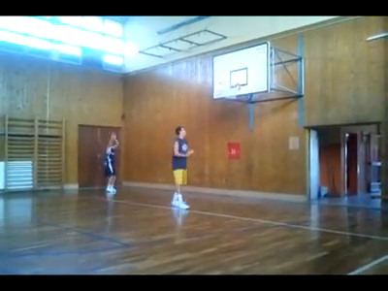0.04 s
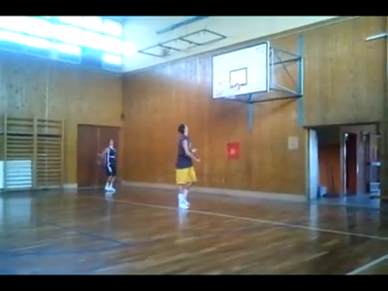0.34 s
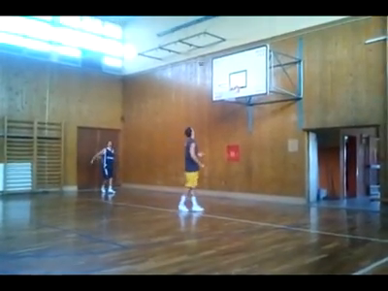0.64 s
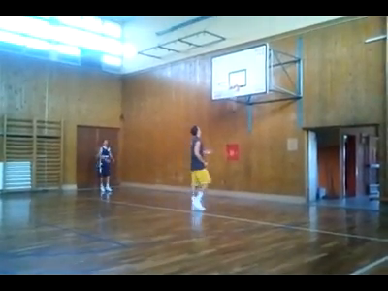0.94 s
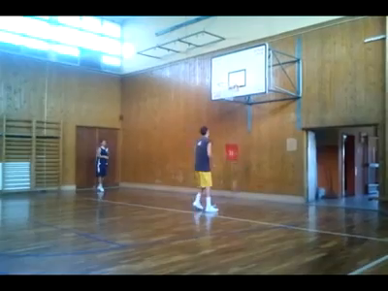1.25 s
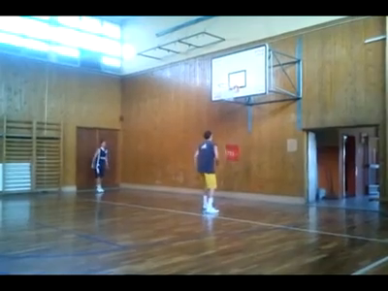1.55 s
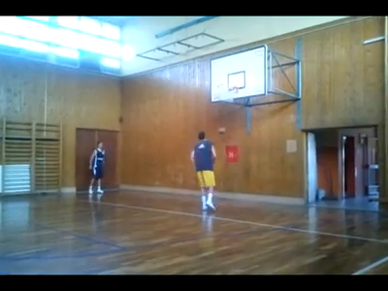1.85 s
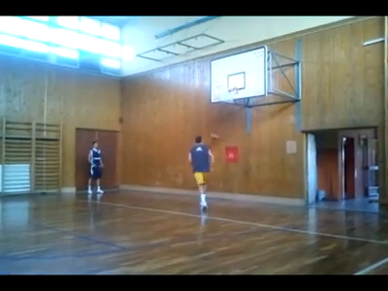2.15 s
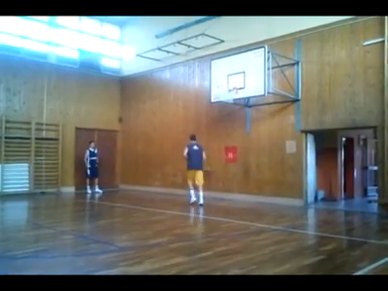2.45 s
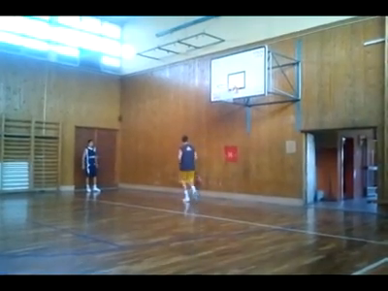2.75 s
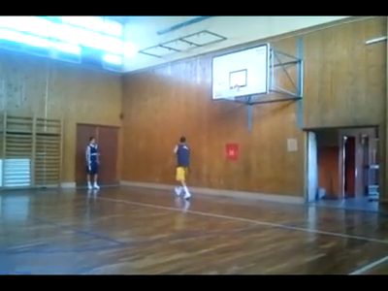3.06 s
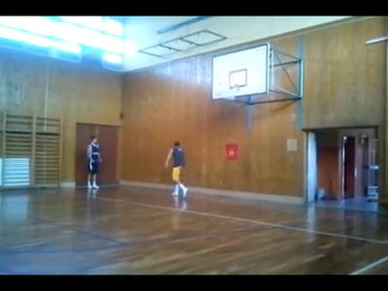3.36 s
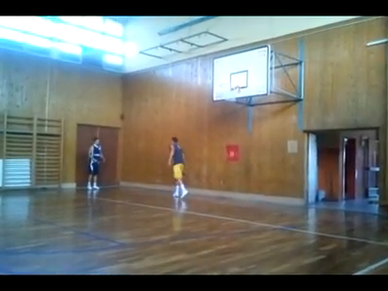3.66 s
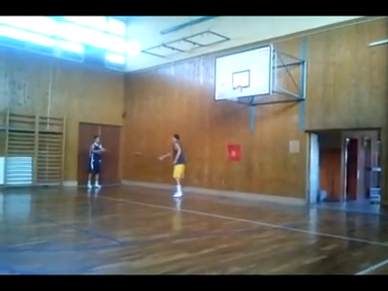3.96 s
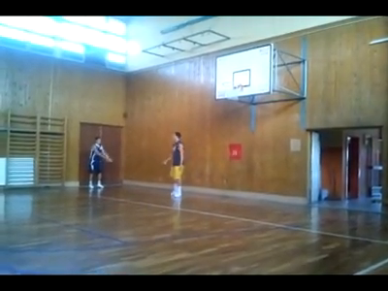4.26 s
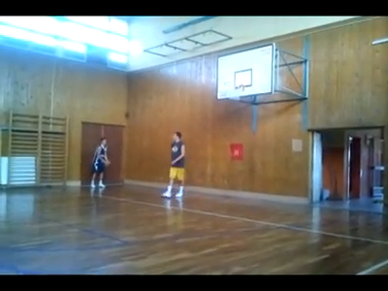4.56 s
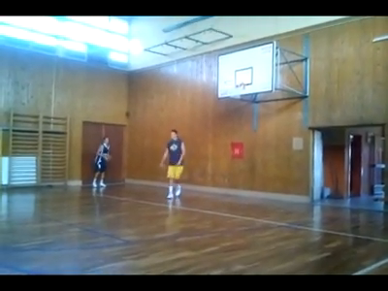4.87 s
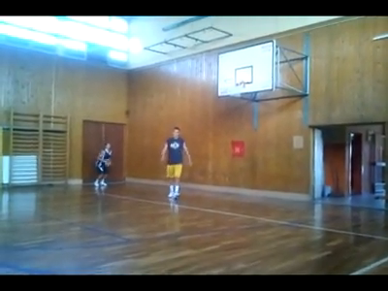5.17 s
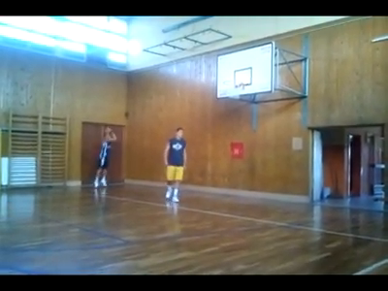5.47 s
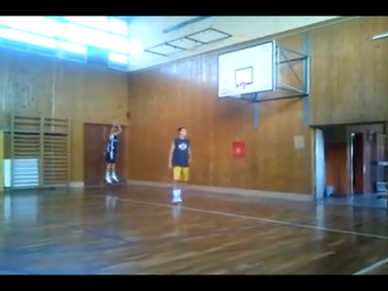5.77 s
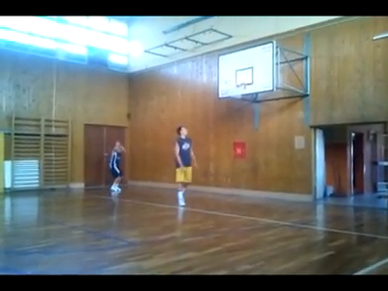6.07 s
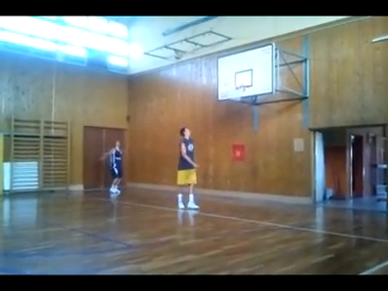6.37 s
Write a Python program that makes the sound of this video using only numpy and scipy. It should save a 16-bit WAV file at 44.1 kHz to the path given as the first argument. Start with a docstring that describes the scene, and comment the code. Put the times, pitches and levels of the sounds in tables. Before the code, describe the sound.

In a large echoing gym, feet land, a basketball clatters against the rim, sneakers squeak and the ball bounces three times.

```python
"""A large, echoing gym with a sprung wooden floor, during shooting practice. A player lands from a jump shot.
The ball strikes the hoop, exciting the modes of the backboard and rattling its loose fittings, then bounces
three times and is caught. Sneakers thud on the boards, scuff by sliding friction and squeak by stick-slip. The
hall reverberates over a steady rumble of air; the sound has no treble above 8 kHz, and the loud blows are
flattened."""
import sys
import numpy as np
from scipy import signal
from scipy.fft import rfft, irfft
from scipy.io import wavfile
from scipy.ndimage import uniform_filter1d

SR = 44100
rng = np.random.default_rng(int(sys.argv[2]) if len(sys.argv) > 2 else 0)


def pcm_store(signal):
    """Save signal as 16-bit PCM."""
    levels = np.round(np.clip(np.atleast_2d(signal), -1, 1) * 32767)
    wavfile.write(sys.argv[1], SR, levels.astype(np.int16).T)


N = 283122

# Spectra of the ball's low thump and bright slap: frequency_hz, relative_db
THUMP_SPECTRUM = [(25, -19), (45, -2), (65, -0.5), (110, 1.5), (175, -5.3), (250, -17.5), (450, -22.5),
                  (700, -26), (1100, -38)]
SLAP_SPECTRUM = [(100, -3), (300, -3), (450, -6.5), (650, -7), (850, 3.5), (1200, 2.5), (1600, 3.2),
                 (2200, 3.8), (3100, -6.5), (5500, -6), (8000, -8)]
# Ball impacts on the floor, the first heard only as reverberation: start_s, thump_db, slap_db, ring_hz
BALL_IMPACTS = [(-1.62, -9.5, -21.5, 846), (1.928, -7.3, -12, 593), (3.244, -10, -19.8, 810),
                (3.933, -10.7, -15.8, 1186)]


def bounces(treble_hz=3500, treble_db=-10.5, ring_t60_s=0.04, ring_db=-26.5):
    """Elastic impact: the ball thumps the floor, its skin slaps the boards, and the boards ring at a pitch that
    changes from spot to spot."""
    out, t = np.zeros(N), seconds(2048)
    thump, slap = knock(THUMP_SPECTRUM), knock(SLAP_SPECTRUM)
    treble = signal.lfilter(*signal.butter(1, treble_hz, "high", fs=SR), slap)
    slap = slap + from_db(treble_db) * treble
    for start_s, thump_db, slap_db, ring_hz in BALL_IMPACTS:
        contact_s = 0.013 * from_db(slap_db)   # a harder bounce keeps the ball flattened longer
        # the contact patch spreads, smearing the slap in time without colouring it
        burst = rfft(rng.standard_normal(len(t)) * np.exp(-t / contact_s))
        spread = irfft(burst / np.abs(burst)) * np.exp(-t / (10 * contact_s))
        smack = signal.fftconvolve(slap, unit_energy(spread))
        board_ring = unit_energy(ring(ring_hz, ring_t60_s, len(slap)))
        add(out, start_s, hall(from_db(thump_db) * thump, direct_db=25.5))
        add(out, start_s, hall(from_db(slap_db) * smack, direct_db=33))
        add(out, start_s, hall(from_db(ring_db) * board_ring, direct_db=17))
    return out


# Spectrum of a fitting hitting the backboard: frequency_hz, relative_db
RATTLE_SPECTRUM = [(60, -3.5), (150, -1.5), (280, -2.7), (600, -4.5), (1000, -2.5), (1400, 0), (1900, 0.5),
                   (2400, -7), (3100, -16.5), (4500, -19), (6200, -24.5), (8000, -29.5)]
# Modes of the backboard and its steel frame: pitch_hz, level_db, t60_s
FRAME_MODES = [(23.93, -12.5, 4.1), (28.3, -22.5, 3.0), (55.2, -16, 6), (69.4, -7, 0.68),
               (136.6, -26.5, 1.6), (627, -28, 6.8), (705, -31.5, 3.5), (897, -31.5, 9.8), (1634, -25, 2.2),
               (1840, -29.5, 2.2), (2573, -30, 2.0)]


def hoop(start_s=1.465, rattle_db=-5, clicks_per_s=400, spread_db=3.5, graze_db=-15, boom_db=-33,
         sway_hz=7.9):
    """Modal vibration: the ball hits the rim, the board booms, the frame rings, loose fittings chatter."""
    out = np.zeros(N)
    clicks = (rng.random(SR) < clicks_per_s / SR) * rng.choice([-1, 1], SR)
    clicks = clicks * from_db(rng.normal(0, spread_db, SR)) * shaking(seconds(SR))
    rattle = unit_energy(signal.fftconvolve(clicks, knock(RATTLE_SPECTRUM)))
    add(out, start_s, hall(from_db(rattle_db) * rattle, direct_db=27))
    add(out, start_s, hall(from_db(graze_db) * knock(SCUFF_SPECTRUM), direct_db=14))
    for pitch_hz, level_db, t60_s in FRAME_MODES:
        swell = 1 - np.exp(-seconds(N) * (pitch_hz / sway_hz) ** 2)   # slow modes build up late
        add(out, start_s, from_db(level_db) * swell * ring(pitch_hz, t60_s, N))
    add(out, start_s, hall(from_db(boom_db) * knock(THUMP_SPECTRUM), direct_db=24))
    return out


def shaking(t, attack_s=0.02, hold_s=0.19, release_s=0.028, sag_db_per_s=20,
            linger_db=-6, linger_t60_s=1.45):
    """Two-stage decay of the rattle's force: the hoop shakes hard, then the fittings chatter on quietly."""
    hard = from_db(-sag_db_per_s * t) * np.exp(-np.maximum(t - hold_s, 0) / release_s)
    lingering = from_db(linger_db - 60 * t / linger_t60_s)
    return (1 - np.exp(-t / attack_s)) * np.maximum(hard, lingering)


def landing(start_s=0.629, heel_lag_s=0.022, toe_db=-17, heel_db=-8.8):
    """Momentum transfer in two impacts: the toes touch, then the heels bring down the whole weight."""
    out = np.zeros(N)
    add(out, start_s, hall(footfall(toe_db), direct_db=18.5))
    add(out, start_s + heel_lag_s, hall(from_db(heel_db) * knock(THUD_SPECTRUM), direct_db=31))
    return out


# Spectra of the boards' thud and the sole's tap: frequency_hz, relative_db
THUD_SPECTRUM = [(25, -3.5), (55, 1), (120, 2.5), (200, -10), (330, -13.5), (600, -17.5), (1100, -25),
                 (2200, -33), (3200, -45), (8000, -50)]
TAP_SPECTRUM = [(200, 0.5), (900, 1.5), (2100, 3), (3200, -6), (5500, -9.5), (8000, -9)]


def footfall(level_db, tap_db=-10):
    """Impact excitation: one blow draws a thud from the boards and a weaker tap from the sole."""
    return from_db(level_db) * (knock(THUD_SPECTRUM) + from_db(tap_db) * knock(TAP_SPECTRUM))


# Feet meeting the floor: start_s, level_db
FOOT_IMPACTS = [(.03, -43), (.118, -38.5), (3.765, -30), (3.828, -29.5), (5.614, -47), (5.84, -42),
                (6.072, -39)]


def steps():
    """Impact sound of walking: each light footfall excites the floor and the hall."""
    out = np.zeros(N)
    for start_s, level_db in FOOT_IMPACTS:
        add(out, start_s, hall(footfall(level_db), direct_db=31))
    return out


# Spectrum of a dragged sole, also of the ball grazing the rim and of cloth brushing: frequency_hz, relative_db
SCUFF_SPECTRUM = [(300, 0.5), (1500, 4), (3200, -3.5), (5500, -2.5), (8000, -0.5)]
# Soles dragging, and at 5.28 s a swish of cloth: start_s, length_s, level_db
DRAGS = [(1.137, 0.21, -34), (2.756, .16, -40.5), (3.221, 0.021, -25), (3.72, 0.07, -33.5),
         (4.871, 0.039, -42), (5.284, 0.19, -37.5), (5.86, .03, -50), (6.029, 0.012, -45),
         (6.4, 0.012, -42)]


def scuffs():
    """Sliding friction: a dragged sole or brushing cloth makes broadband noise that swells and fades with the
    stroke."""
    out, t = np.zeros(N), seconds(SR // 2)
    for start_s, length_s, level_db in DRAGS:
        stroke = np.sin(np.pi * np.minimum(t / length_s, 1))
        friction = signal.fftconvolve(stroke * rng.standard_normal(len(t)), knock(SCUFF_SPECTRUM))
        add(out, start_s, hall(from_db(level_db) * unit_energy(friction), direct_db=31.5))
    return out


# Soles sticking and slipping: start_s, length_s, pitch_hz, waver_hz, level_db
SOLE_SQUEAKS = [(.645, 0.06, 4780, 200, -36.5), (1.688, 0.06, 4230, 150, -23),
                (1.69, 0.042, 7650, 190, -21.5), (1.717, 0.037, 4140, 65, -19),
                (6.029, .014, 6140, 400, -59)]


def squeaks(sag_hz=95, beam_db=41, beam_hz=4200, beam_fall_db_per_octave=12):
    """Stick-slip oscillation: rubber on varnish whistles unsteadily, sinking in pitch as the foot slows."""
    out, t = np.zeros(N), seconds(SR // 4)
    for start_s, length_s, pitch_hz, waver_hz, level_db in SOLE_SQUEAKS:
        progress = np.minimum(t / length_s, 1)
        waver = uniform_filter1d(rng.standard_normal(len(t)), size=50)
        slip_hz = pitch_hz - sag_hz * (progress - .5) + waver_hz * waver / waver.std()
        tone = np.sin(2 * np.pi * np.cumsum(slip_hz) / SR)
        whistle = from_db(level_db) * unit_energy(np.sin(np.pi * progress) * tone)
        direct_db = beam_db - beam_fall_db_per_octave * np.log2(pitch_hz / beam_hz)
        add(out, start_s, from_db(direct_db) * whistle)   # direct path, weaker for high whistles
        add(out, start_s, hall(whistle, direct_db=13))
    return out


def catch(start_s=4.872, pitch_hz=350, t60_s=0.052, level_db=-40.3):
    """Damped resonance: the ball gives a hollow pop as hands close on it."""
    out = np.zeros(N)
    pop = from_db(level_db) * unit_energy(ring(pitch_hz, t60_s, SR // 4))
    add(out, start_s, hall(pop, direct_db=40))
    return out


# Reverberation time of the hall: frequency_hz, t60_s
REVERBERATION_TIMES = [(40, 1.6), (100, 1.5), (200, 1.47), (400, 3), (800, 4), (1600, 4), (2800, 3.5),
                       (4200, 2.5), (7500, 1.55)]


def diffuse_tail(t, band_count=12):
    """Diffuse field: overlapping bands of noise, each decaying exponentially at its own rate."""
    centres_hz = np.geomspace(40, 8000, band_count)
    hz = np.fft.rfftfreq(len(t), 1 / SR)
    bands = np.array([at_hz(np.column_stack([centres_hz, row]), hz) for row in np.eye(band_count)])
    decays = from_db(-60 * t / at_hz(REVERBERATION_TIMES, centres_hz)[:, None])
    band_noise = irfft(bands * rfft(rng.standard_normal(len(t))))
    return np.sum(band_noise * decays, axis=0)


# Early wall reflections, relative to the direct sound: delay_s, level_db
WALL_REFLECTIONS = [(.0045, -6.5), (.019, -6.5), (.0225, -11.5), (0.033, -8), (0.037, -6.5), (.087, -9)]


def hall(sound, direct_db, early_db=0.5, early_s=0.044, build_s=0.004):
    """Room impulse response: direct sound, early reflections and a tail that differs from spot to spot."""
    t = seconds(4 * SR)
    response = diffuse_tail(t) * (1 - np.exp(-t / build_s)) * from_db(early_db * np.exp(-t / early_s))
    response[0] += from_db(direct_db)
    for delay_s, level_db in WALL_REFLECTIONS:
        response[round(abs(delay_s) * SR)] += from_db(direct_db + level_db)
    return signal.fftconvolve(sound, response)


# Spectrum of the room's air noise: frequency_hz, relative_db
AIR_SPECTRUM = [(12, -21.5), (20, 1), (160, -3.5), (233, -14.5), (575, -15), (859, -12.5), (1020, -16.5),
                (1130, -12), (1250, -15), (2070, -18.5), (3680, -33), (7420, -25.5), (8000, -34.5),
                (10400, -73), (17600, -120)]


def air(level_db=-41.5):
    """Stationary noise: the steady rumble and hiss of the big room."""
    colour = from_db(at_hz(AIR_SPECTRUM, np.fft.rfftfreq(N, 1 / SR)))
    noise = irfft(rfft(rng.standard_normal(N)) * colour, N)
    return from_db(level_db) * noise / noise.std()


def knock(spectrum, size=8192):
    """Minimum phase: the shortest causal pulse with this spectrum, at unit energy."""
    cepstrum = irfft(np.log(from_db(at_hz(spectrum, np.fft.rfftfreq(size, 1 / SR)))))
    cepstrum[1:size // 2] *= 2
    cepstrum[size // 2 + 1:] = 0
    return unit_energy(irfft(np.exp(rfft(cepstrum))))


def ring(pitch_hz, t60_s, count):
    """Damped harmonic oscillator: a struck mode falls 60 dB in t60_s."""
    t = seconds(count)
    return from_db(-60 * t / t60_s) * np.sin(2 * np.pi * pitch_hz * t)


def from_db(db):
    """Decibels to amplitude ratio."""
    return 10 ** (np.asarray(db) / 20)


def at_hz(points, hz):
    """Interpolation of a table on a log-frequency axis."""
    known_hz, values = np.transpose(points)
    return np.interp(np.log(np.maximum(hz, 1)), np.log(known_hz), values)


def unit_energy(x):
    """Normalisation to energy 1."""
    return x / np.sqrt(np.sum(x ** 2) + 1e-20)


def seconds(count):
    """Time axis of count samples."""
    return np.arange(count) / SR


def add(out, start_s, sound):
    """Superposition of a sound onto the mix, from start_s on."""
    start = round(start_s * SR)
    part = sound[max(-start, 0):N - start]
    out[max(start, 0):][:len(part)] += part


def scene():
    """Superposition of all sources on the court at one listening point."""
    return (bounces() + hoop() + landing() + steps() + scuffs() + squeaks() + catch() + air())[None]


def record(dry, overload=1.0, ceiling=0.98, band_hz=8050, cutoff_hz=16000):
    """Saturation: loud peaks are rounded off, the treble above 8 kHz is removed, and the peaks that remain are
    clipped flat."""
    narrow = signal.ellip(14, .2, 90, band_hz, fs=SR, output="sos")
    driven = signal.sosfilt(narrow, dry)
    rounded = driven / (1 + (driven / overload) ** 6) ** (1 / 6)
    clipped = np.clip(signal.sosfilt(narrow, rounded), -ceiling, ceiling)
    return signal.sosfilt(signal.ellip(12, .2, 80, cutoff_hz, fs=SR, output="sos"), clipped)


dry = scene()
out = record(dry)
pcm_store(out)
```